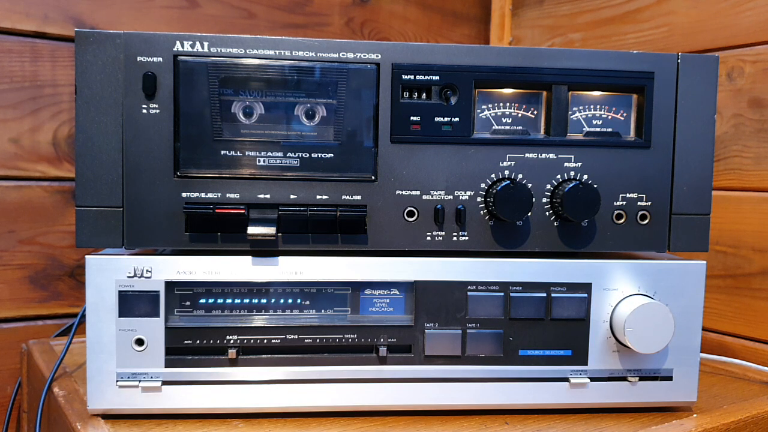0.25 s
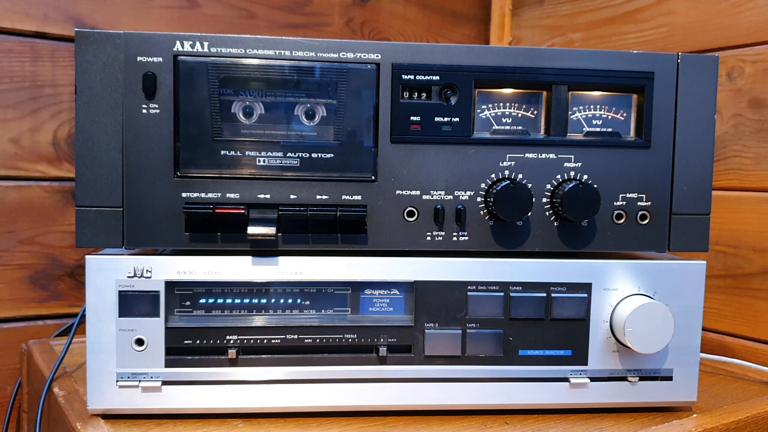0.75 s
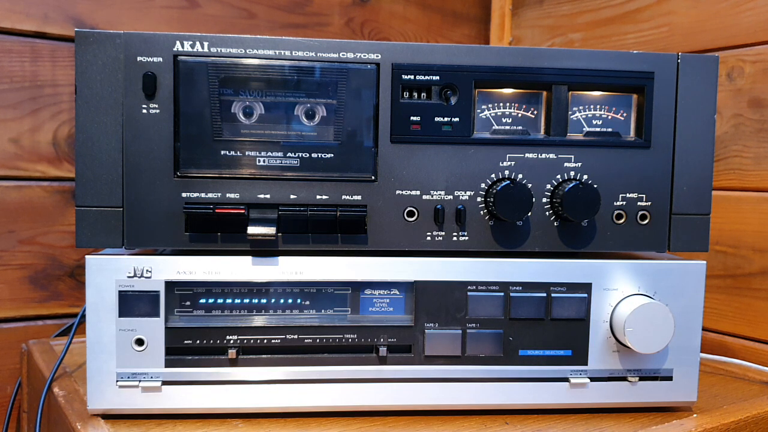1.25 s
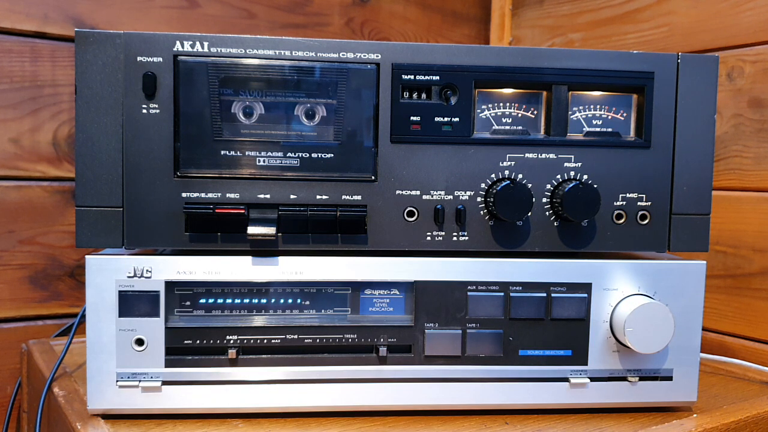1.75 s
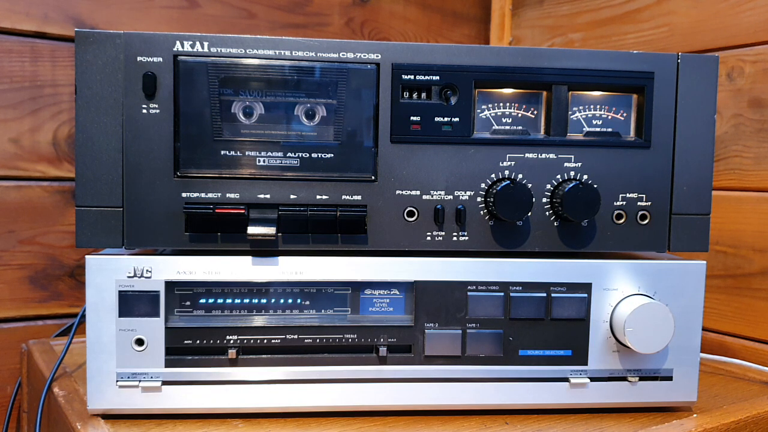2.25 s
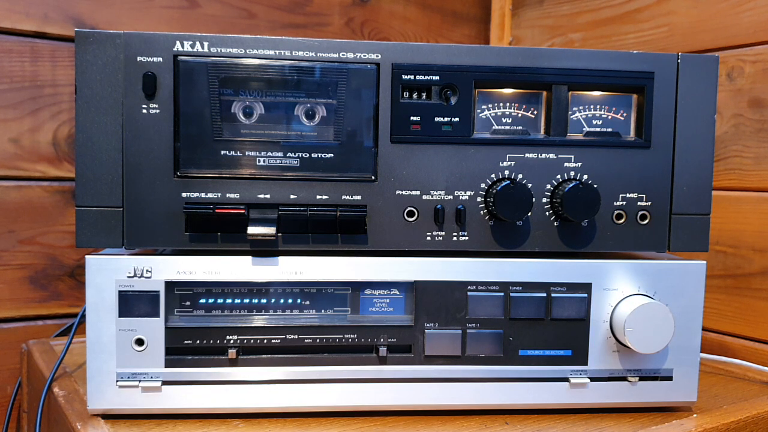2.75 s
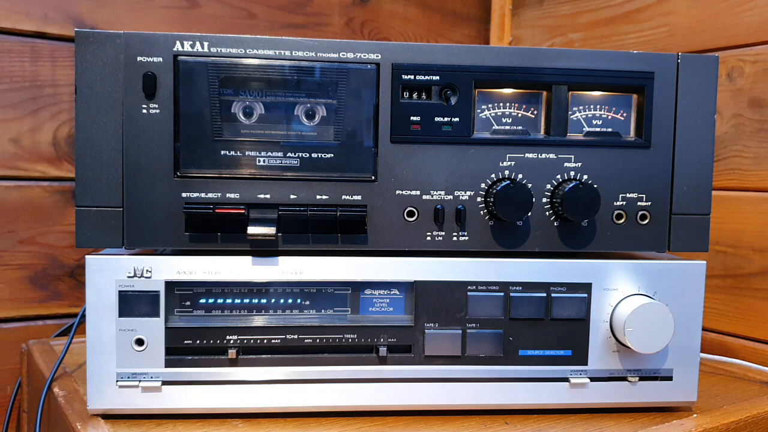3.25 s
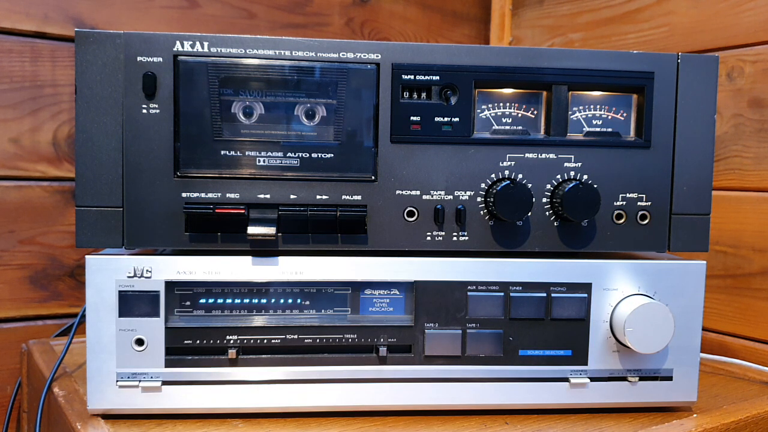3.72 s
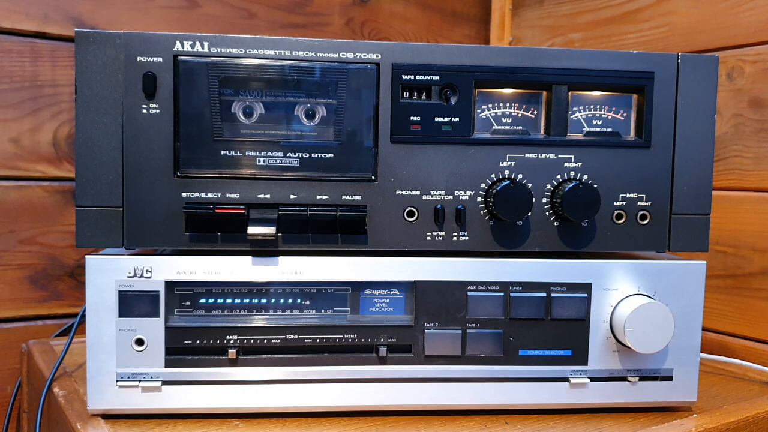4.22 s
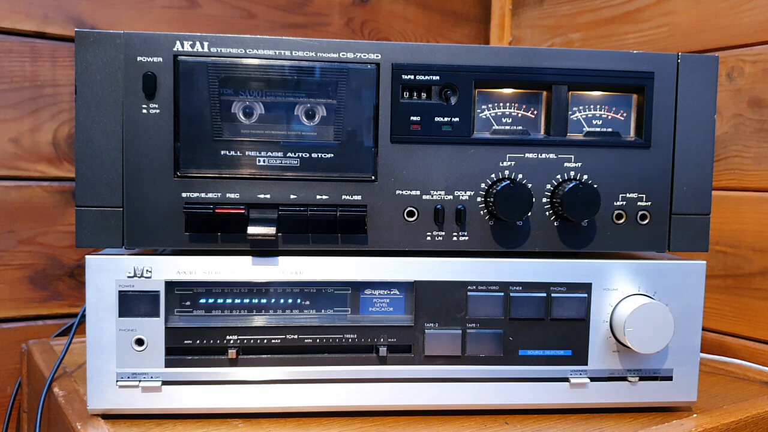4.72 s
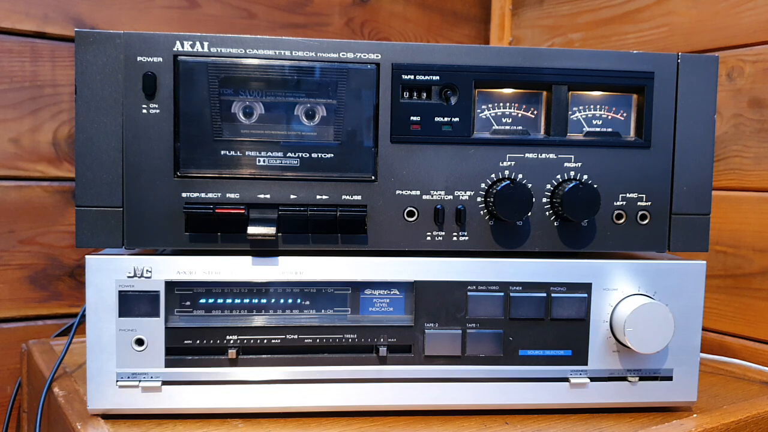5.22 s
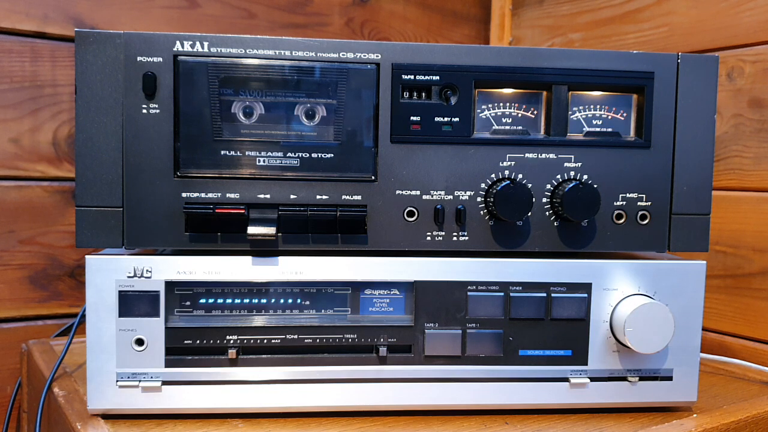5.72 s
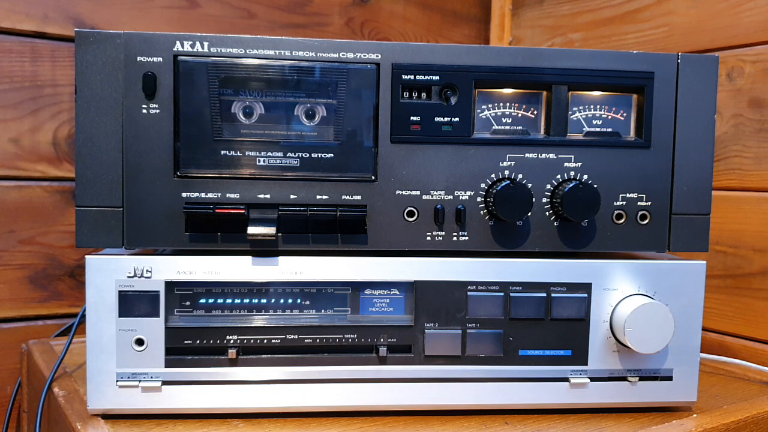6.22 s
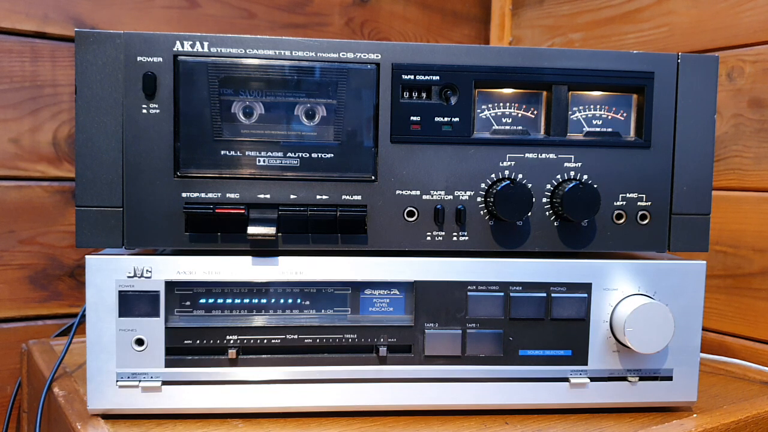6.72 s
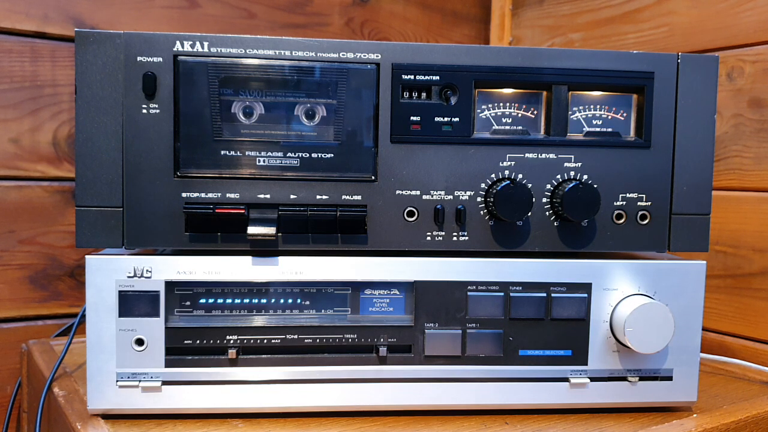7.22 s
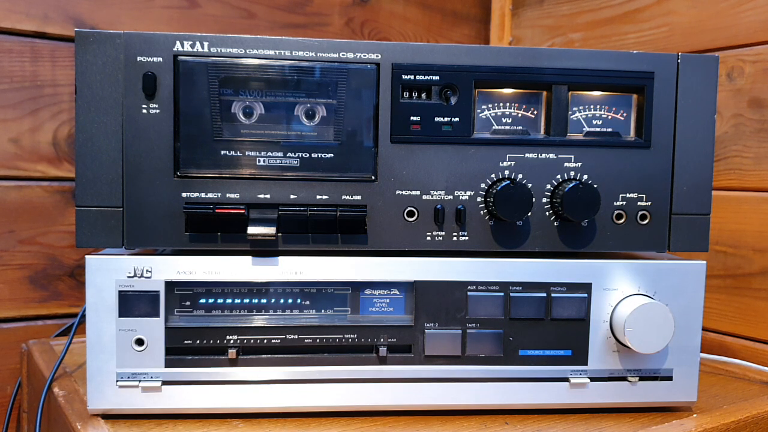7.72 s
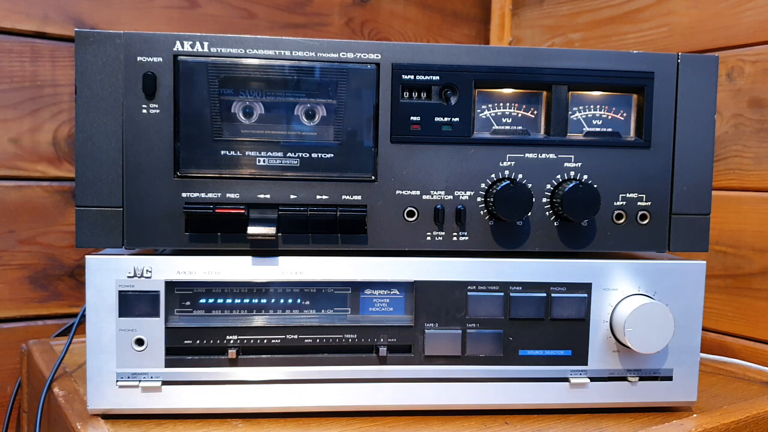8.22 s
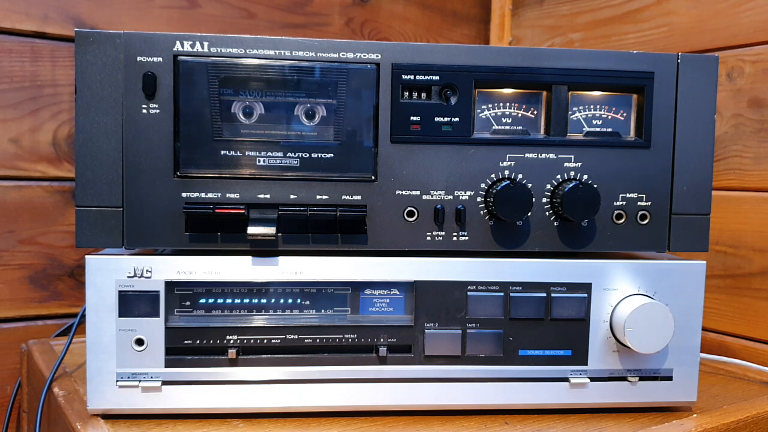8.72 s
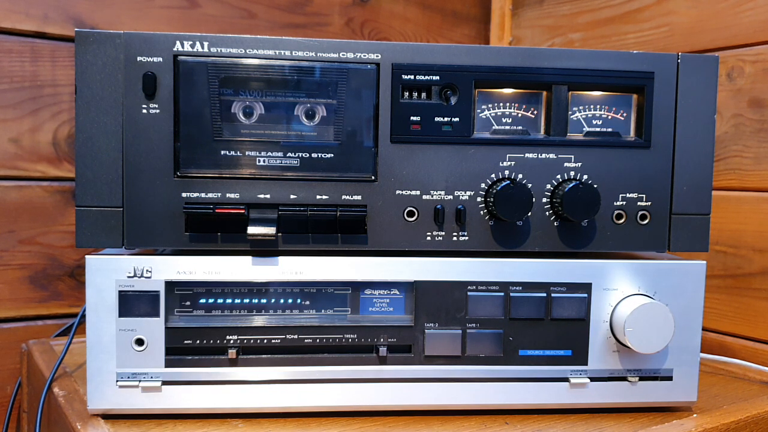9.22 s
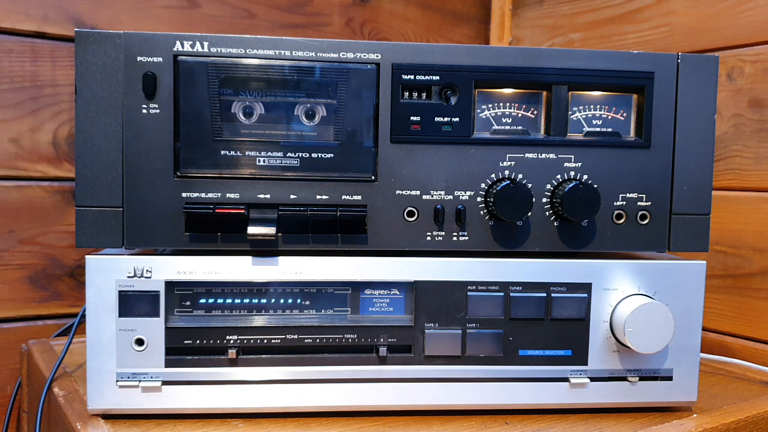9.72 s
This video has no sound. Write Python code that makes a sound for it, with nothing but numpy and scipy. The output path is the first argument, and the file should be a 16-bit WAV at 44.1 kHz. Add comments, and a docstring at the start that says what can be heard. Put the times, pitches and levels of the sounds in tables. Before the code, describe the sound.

A cassette deck rewinds close by with a steady, low plastic hum and soft whirr, over faint traffic rumble in a quiet room.

```python
"""A steady plastic hum comes first: a cassette deck rewinds close by on a wooden shelf.
Two gears of 33 and 25 teeth mesh with a hum of many partials that throbs once a turn of each gear.
Their rough flanks whirr as filtered noise, and the tape rustles brightly onto the reel.
Behind them traffic rumbles through the walls, something ticks faintly in the room
and the two microphones hiss."""
import sys
import numpy as np
from scipy.fft import rfft, irfft, next_fast_len
from scipy.io import wavfile
from scipy.ndimage import map_coordinates

SR = 44100
rng = np.random.default_rng(int(sys.argv[2]) if len(sys.argv) > 2 else 0)


def transcribe(signal):
    """Save signal, clipped to [-1, 1], as a 16-bit WAV file at the path in sys.argv[1]."""
    frames = np.atleast_2d(signal).T
    limited = np.clip(frames, -1, 1)
    pcm = np.round(limited * 32767).astype(np.int16)
    wavfile.write(sys.argv[1], SR, pcm)


N = 438794
T = np.arange(N) / SR  # time of each sample, s
STEP = 32  # samples between points of slow controls
SLOW_T = T[::STEP]
BIG_TEETH, SMALL_TEETH = 33, 25
TOP_HZ = 15720  # band limit


def amp(db):
    """Turn a level in dB into a gain."""
    return 10 ** (np.asarray(db) / 20)


def unit(x):
    """Scale a sound to an rms of 1."""
    return x / np.sqrt(np.mean(x ** 2) + 1e-20)


def along(points, hz):
    """Read a curve of (Hz, value) points, with straight lines on a log frequency axis."""
    point_hz, values = np.transpose(points)
    return np.interp(np.log(hz + 1), np.log(point_hz + 1), values)


def curves(rows):
    """Draw one curve over time for each column after the time column."""
    seconds, *columns = np.transpose(rows)
    return [np.interp(T, seconds, column) for column in columns]


def wobble(rate):
    """Make a smooth random curve through `rate` random points a second."""
    knots = rng.standard_normal(int(N * rate / SR) + 4)
    return np.interp(T, SLOW_T, map_coordinates(knots, [SLOW_T * rate]))


def noise():
    """Make two unrelated channels of white noise."""
    return rng.standard_normal((2, N))


def filtered(x, response):
    """Multiply the spectrum of x by a response that depends on frequency."""
    size = next_fast_len(N + 8192)
    gain = response(np.fft.rfftfreq(size, 1 / SR))
    return irfft(rfft(x, size) * gain, size)[..., :N]


# How alike the left and right channels are: frequency_hz, likeness (1 same, 0 unrelated, -1 opposite)
LIKENESS = [(60, .98), (170, .9), (250, .6), (320, .35), (500, .15), (600, -.2), (750, .05), (900, -.2),
            (1500, -.35), (2500, -.28), (3300, -.22), (5500, -.08), (15000, 0)]
# How much louder the left is than the right: frequency_hz, left_minus_right_db
LEFT_LEAN = [(60, -1), (130, -2.5), (230, -7), (330, 3.5), (550, -2.5), (750, 1), (1200, 0.5), (2000, 0),
             (3300, -1), (4200, -3), (5000, 0), (6500, -1.5), (8000, 1)]


def diffuse(pair, spectrum):
    """Colour two unrelated signals and mix them as spaced microphones hear a roomy sound; rms 1."""
    def mid_side_gains(hz):
        angle = np.arccos(np.clip(along(LIKENESS, hz), -1, 1)) / 2
        return amp(along(spectrum, hz)) * [np.cos(angle), np.sin(angle)]

    def lean_gains(hz):
        return amp(np.outer([.5, -.5], along(LEFT_LEAN, hz)))

    mid, side = filtered(pair, mid_side_gains)
    return unit(filtered(np.array([mid + side, mid - side]), lean_gains))


# Speed of the gears: start_s, mesh_rate_hz (teeth meshing per second)
MESH_SPEED = [(0, 202.6), (.375, 203.8), (.625, 203.8), (.875, 204.7), (1.27, 207.7), (1.75, 206.8),
              (2.05, 206.7), (2.5, 205.4), (2.875, 204.9), (3.1, 206.6), (3.6, 206.85), (3.9, 205.95),
              (4.4, 206.65), (4.62, 206.6), (4.75, 207.3), (5, 207.15), (5.22, 205.75), (5.9, 205.8),
              (6.25, 205), (6.7, 204.75), (6.875, 204.2), (7.25, 204.85), (8.125, 204.4), (8.52, 203.4),
              (8.8, 204.55), (9.27, 204.95), (9.625, 203.55), (9.95, 203)]


def gear_motion():
    """Add up the changing mesh rate to count the teeth that have met so far."""
    mesh_hz, = curves(MESH_SPEED)
    return np.cumsum(mesh_hz) / SR, mesh_hz


# Hum partials, before they swell: multiple (of the mesh rate), left_db, right_db, left_lead_rad,
# faster_db (initial dB per Hz of faster meshing; levels off at this many dB)
HUM_PARTIALS = [(1, -46.8, -45.2, -0.13, 0.2), (1.84, -72.8, -71.4, -0.06, -0.3),
                (2, -57.1, -59.0, 0.22, -0.3), (3, -76.1, -74.3, 2.83, 0.1), (4, -62.6, -68.2, 0.95, 1.7),
                (5, -65.0, -70.7, 0.78, -0.2), (5.515, -73.3, -82.9, 1.11, -0.4),
                (6, -70.4, -71.4, 0.74, -1.2), (7, -66.2, -67.4, 1.43, 0.2), (8, -76.3, -82.8, -0.02, -0.8),
                (9.03, -74.8, -81.3, 2.78, 2.6), (11, -79.2, -79.1, -1.57, -0.1),
                (13, -78.4, -82.3, 2.52, -0.5), (14, -81.1, -81.5, -3.03, 1.4)]
# Swell of each partial, once a turn of the big gear: depth (share), loudest_at_turns
HUM_SWELL = [(.06, .24), (.14, .26), (.02, .92), (.2, .16), (.53, .99), (.44, .23), (.94, .2), (.11, .38),
             (.28, .84), (.65, .02), (.11, .52), (.99, .84), (.47, .89), (.67, .79)]
# Gear run-out, once and twice a turn of the big gear and once a turn of the small one:
# period_meshes, waver_rad (nearly, on high partials), furthest_ahead_at_periods
GEAR_RUNOUT = [(33, .75, .2), (16.5, .5, .67), (25, .3, .7)]
RUNOUT_KNEE = 3.3  # multiple of the mesh rate; the run-out is weak below it and strong above
SMALL_SWELL = .2  # full depth of the small gear's swell, before the knee


def hum(meshes, mesh_hz):
    """Meshing teeth ring a set of partials; run-out makes them throb and speed shifts their level."""
    out = np.zeros((2, N))
    jitter = 0.026 * wobble(25)  # tooth timing scatter in rad, felt more by high partials
    faster = np.tanh(mesh_hz - mesh_hz.mean())  # the gain levels off past a chassis resonance

    def throb(period, at):
        return np.cos(2 * np.pi * (meshes[::STEP] / period - at))

    waver = sum(rad * throb(period, ahead) for period, rad, ahead in GEAR_RUNOUT)
    for partial, (depth, loudest) in zip(HUM_PARTIALS, HUM_SWELL):
        multiple, left_db, right_db, lead, faster_db = partial
        small_swell = SMALL_SWELL * throb(SMALL_TEETH, rng.uniform())  # a moment of its own
        runout_share = np.tanh((multiple / RUNOUT_KNEE) ** 3)
        # The real part changes loudness; the imaginary part mostly moves the phase.
        shape = 1 + depth * throb(BIG_TEETH, loudest) + runout_share * (small_swell + 1j * waver)
        drift_db = faster_db * faster + 0.21 * multiple ** .5 * wobble(1.1)
        shape = np.interp(T, SLOW_T, shape) * amp(drift_db)
        phase = multiple * (2 * np.pi * meshes + jitter) + rng.uniform(0, 2 * np.pi)
        tone = shape * np.exp(1j * phase)
        out[0] += np.sqrt(2) * amp(left_db) * tone.real
        out[1] += np.sqrt(2) * amp(right_db) * (tone * np.exp(-1j * lead)).real
    return out


# Narrow hiss around the partials: multiple (of the mesh rate), left_db, right_db
# (the gains given to the random curves)
BLUR_BANDS = [(1.95, -67.5, -71), (4.016, -77, -67), (5.03, -67, -69.5), (5.91, -73.5, -75),
              (7.075, -72.5, -71), (8.03, -72, -71), (8.97, -72.5, -77), (10, -75, -79.5),
              (10.97, -75.5, -75.5), (11.56, -73, -77), (13.04, -73, -77), (14.19, -82.5, -88),
              (14.11, -82, -77), (16.32, -71, -95), (18.05, -77, -77), (23.72, -83, -79.5)]


def blur(meshes):
    """Contacts of random size and timing spread partials into noise bands, wider on high ones."""
    out = np.zeros((2, N))
    for multiple, *db in BLUR_BANDS:
        rate = 30.0 + 4.0 * multiple  # random points a second: more make a wider band
        left_cos, left_sin, right_cos, right_sin = (wobble(rate) for _ in range(4))
        angle = 2 * np.pi * multiple * meshes
        cos, sin = np.cos(angle), np.sin(angle)
        left = left_cos * cos + left_sin * sin
        right = right_cos * cos + right_sin * sin
        out += amp(db)[:, None] * np.array([left, right])
    return out


def flanks(meshes, teeth):
    """A gear's rough teeth repeat the same noise at every turn."""
    fine = 128  # points per tooth
    surfaces = rng.standard_normal((2, teeth * fine))  # one for each channel
    sound = [map_coordinates(s, [meshes * fine], order=1, mode="grid-wrap") for s in surfaces]
    return unit(np.array(sound))


# Tape drag over time: start_s, drag_db
TAPE_DRAG = [(0, -1), (.6, 0), (4.4, -0.5), (6.2, 2), (7.1, -1.1), (7.8, -0.5), (8.9, -1), (9.4, 2.5),
             (9.95, 1)]
# Colour of the chassis shaken by gears and tape: frequency_hz, level_db (per Hz, relative)
WHIRR_COLOUR = [(60, -51), (110, -2), (260, -3.5), (350, -7.5), (580, -11.5), (690, -8.5), (760, -5.5),
                (870, -9), (1360, -8), (1550, -13.5), (2800, -13.5), (3700, -18.5), (5000, -27),
                (16000, -61)]
# Colour of the rustling tape: frequency_hz, level_db (per Hz, relative)
RUSTLE_COLOUR = [(2000, -41), (3500, -2.5), (5000, -4.5), (7100, -4.5), (7800, -10.5), (8800, -24),
                 (16000, -45)]
# Rubbing swell: times_per_turn (of the big gear), depth (share), loudest_at_cycles (of its own swell)
TAPE_RUB = [(1, 0.11, 0.25), (2, 0.1, 0.7), (3, 0.096, 0.92)]
WHIRR_DB, RUSTLE_DB = -53, -73  # base levels, before drag, rubbing and random drift
WHIRR_FOLLOWS = .45  # share of the drag's dB swing that the whirr follows


def whirr(meshes):
    """Gear roughness and slip noise peak at each tooth contact; tape rubs in a swell each turn."""
    drag_db, = curves(TAPE_DRAG)
    rough = 0.44 * flanks(meshes, BIG_TEETH) + 0.28 * flanks(meshes, SMALL_TEETH)
    slip = 0.97 * noise()
    contact = 1 + 0.14 * np.cos(2 * np.pi * meshes)
    turns = meshes / BIG_TEETH
    rub = 1 + sum(depth * np.cos(2 * np.pi * (times * turns - at)) for times, depth, at in TAPE_RUB)

    whirr_db = WHIRR_DB + WHIRR_FOLLOWS * drag_db + 0.46 * wobble(6)
    # The power 0.52 makes the whirr swell less than the rustle.
    body = amp(whirr_db) * rub ** 0.52 * diffuse((rough + slip) * contact, WHIRR_COLOUR)
    rustle_db = RUSTLE_DB + drag_db + 0.74 * wobble(8.3) + 0.65 * wobble(2.89)
    rustle = amp(rustle_db) * rub * diffuse(noise(), RUSTLE_COLOUR)
    return body + rustle


# Traffic loudness: start_s, deep_db, upper_db
TRAFFIC_LEVELS = [(0, -49, -48), (.33, -51, -56), (.9, -52, -46), (1.35, -46.5, -55), (2, -51, -47.5),
                  (3, -49, -55), (3.95, -49.5, -51.5), (4.3, -46, -53), (4.95, -47.5, -56),
                  (5.6, -49.5, -49), (6.1, -47, -55.5), (6.95, -50, -54.5), (7.3, -51.5, -52.5),
                  (7.95, -45, -51.5), (8.8, -50, -52.5), (9.25, -47.5, -48), (9.95, -51, -49)]
# Colour of the deep rumble: frequency_hz, level_db (per Hz, relative)
DEEP_COLOUR = [(10, -53), (25, -1), (40, 10), (57, 12.5), (72, 4.5), (90, -48.5)]
# Colour of the upper rumble: frequency_hz, level_db (per Hz, relative)
UPPER_COLOUR = [(55, -27), (70, 8), (88, 10), (105, -3.5), (130, -16.5), (200, -56)]


def traffic():
    """Traffic comes through the walls as low noise in two room bands, each with its own loudness."""
    deep_db, upper_db = curves(TRAFFIC_LEVELS)
    deep = amp(deep_db) * diffuse(noise(), DEEP_COLOUR)
    upper = amp(upper_db) * diffuse(noise(), UPPER_COLOUR)
    return deep + upper


# Engines passing far off: start_s, end_s, start_pitch_hz, end_pitch_hz,
# level_db (mid-pass, before random drift and a small left-right offset)
ENGINE_DRONES = [(0.113, .45, 58.6, 63.3, -48), (0.57, 2.1, 88.1, 86.2, -52.5), (1.1, 2.7, 30, 32.4, -53),
                 (2.297, 2.8, 54, 51.3, -49.5), (2.3, 3.5, 85.5, 88.2, -54.5),
                 (4.103, 4.497, 56.15, 53, -42.5), (4.55, 5.3, 63, 59.4, -50), (5.45, 5.845, 76, 76, -49.5),
                 (5.75, 6.148, 86.3, 85.2, -51), (7.906, 8.5, 55, 52, -48.5), (8.3, 8.9, 62.5, 69.5, -48),
                 (8.88, 9.855, 56.06, 60.1, -43.5)]


def engines():
    """Each far engine is a wavering low tone that glides in pitch, swells and fades."""
    out = np.zeros((2, N))
    for start, end, start_hz, end_hz, db in ENGINE_DRONES:
        progress = np.clip((T - start) / (end - start), 0, 1)
        hz = start_hz + (end_hz - start_hz) * progress + 0.55 * wobble(5.5)
        swell = np.sqrt(np.abs(np.sin(np.pi * progress))) * amp(db + 1.7 * wobble(6.5))
        tone = np.sqrt(2) * swell * np.sin(2 * np.pi * np.cumsum(hz) / SR)
        out += amp([[-.6], [.6]]) * tone  # slightly louder on the right
    return out


# Faint room ticks: start_s, knock_db, scuff_db, snap_db (before the rise and decay),
# t60_s (time to fall by 60 dB)
ROOM_TICKS = [(.185, -70, -63, -85, .2), (1.294, -46, -62, -68, .24), (2.93, -70, -65, -88, .2),
              (4.627, -66, -67, -68, .18), (6.735, -70, -70, -72, .16)]
# Colour of the low knock: frequency_hz, level_db (per Hz, relative)
KNOCK_COLOUR = [(300, -40), (480, -2), (750, -4), (1080, 2), (1500, -8), (3000, -16), (5000, -40)]
# Colour of the middle scuff: frequency_hz, level_db (per Hz, relative)
SCUFF_COLOUR = [(2000, -30), (3500, -2), (5000, 0), (7500, -4), (9500, -25)]
# Colour of the high snap: frequency_hz, level_db (per Hz, relative)
SNAP_COLOUR = [(5000, -30), (8000, 0), (13500, 0), (15700, -2)]


def ticks():
    """Each tick is three bands of noise that rise quickly and die away as the room's short tail."""
    envelopes = np.zeros((3, N))
    for start, *db, t60 in ROOM_TICKS:
        age = np.maximum(T - start, 0)
        rise = 1 - np.exp(-age / .005)
        decay = amp(-60 * age / t60)
        envelopes += amp(db)[:, None] * decay * rise
    colours = KNOCK_COLOUR, SCUFF_COLOUR, SNAP_COLOUR
    return sum(envelope * diffuse(noise(), colour) for envelope, colour in zip(envelopes, colours))


def scene():
    """Add the deck, the street and the room together."""
    meshes, mesh_hz = gear_motion()
    deck = hum(meshes, mesh_hz) + blur(meshes) + whirr(meshes)
    return deck + traffic() + engines() + ticks()


# Colour of the microphone noise: frequency_hz, level_db (per Hz, relative)
HISS_COLOUR = [(4000, -34), (7000, 7), (8900, -27), (10300, -2), (11000, -1), (14800, -1.5), (15100, 0),
               (15700, 6.5)]


def record(dry):
    """Each microphone adds its own hiss; nothing passes above the band limit."""
    hiss = unit(filtered(noise(), lambda hz: amp(along(HISS_COLOUR, hz)) * (hz < TOP_HZ)))
    hiss_gain = amp([[-79.0], [-79.5]])  # left and right, dB
    return filtered(dry + hiss_gain * hiss, lambda hz: hz < TOP_HZ)


dry = scene()
out = record(dry)
transcribe(out)
```